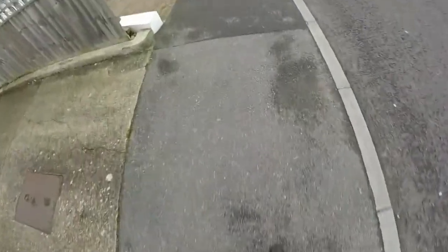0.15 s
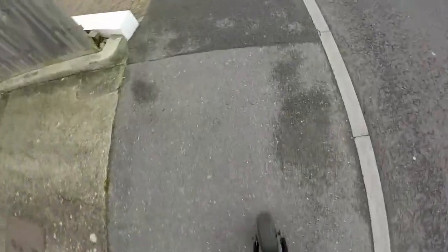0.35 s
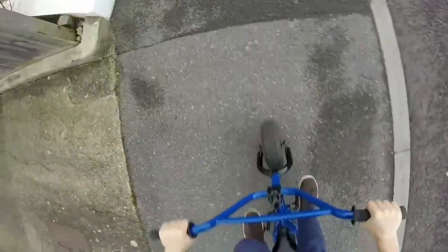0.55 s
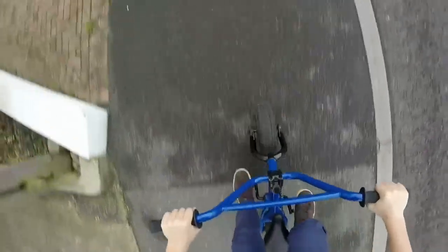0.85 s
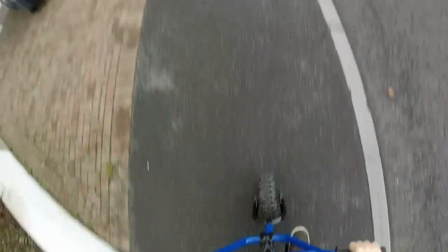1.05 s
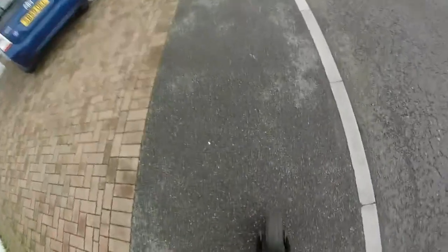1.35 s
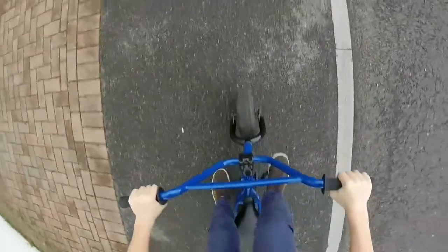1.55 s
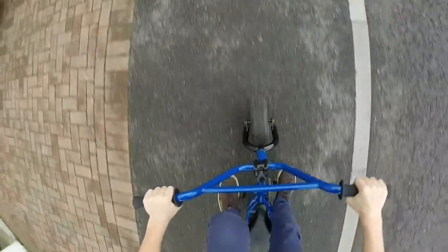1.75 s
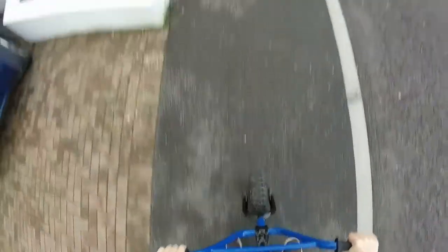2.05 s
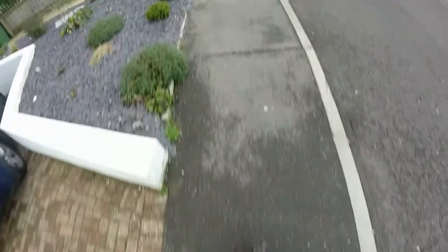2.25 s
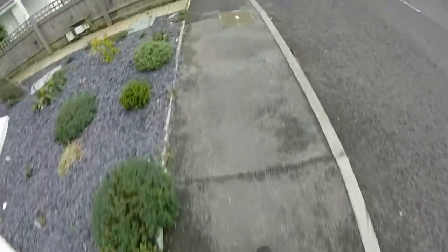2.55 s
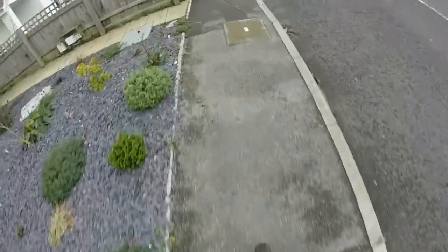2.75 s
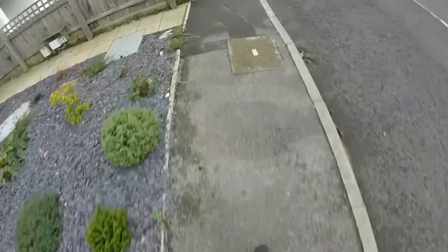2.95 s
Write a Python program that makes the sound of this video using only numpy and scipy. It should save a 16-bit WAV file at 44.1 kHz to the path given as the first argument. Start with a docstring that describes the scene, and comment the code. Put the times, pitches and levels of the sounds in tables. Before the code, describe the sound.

Wind buffets the microphone as a rolling bicycle gives raspy squeaks and light rattles.

```python
"""An asphalt pavement, heard from a small rolling bike through a microphone worn by the rider.
Wind rumbles on the microphone; the tyres hiss, hum and crackle over grit.
Road shake makes the metal frame jingle, chain and frame tick, and a loose part pings.
Something on the bike rubs: dense slips ring its resonances in short, quack-like rasps
that sometimes chirp, and near the end it drags in one longer scrape."""
import sys
import numpy as np
from scipy import signal
from scipy.fft import rfft, irfft
from scipy.io import wavfile
from scipy.ndimage import uniform_filter1d

SR = 44100
rng = np.random.default_rng(int(sys.argv[2]) if len(sys.argv) > 2 else 0)


def bounce(signal):
    """Save signal as a 16-bit WAV file at the path given by the first command-line argument."""
    frames = np.transpose(np.atleast_2d(signal))
    limited = np.clip(frames, -1, 1)
    pcm = np.round(limited * 32767).astype(np.int16)
    wavfile.write(sys.argv[1], SR, pcm)


N = 138915
T = np.arange(N) / SR


def amp(db):
    """Decibels to gain."""
    return 10 ** (np.asarray(db) / 20)


def unit(x):
    """Scales to rms 1."""
    return x / np.sqrt(np.mean(x ** 2) + 1e-20)


def curve(rows, column=1):
    """One column of a time table, interpolated per sample."""
    rows = np.array(rows)
    return np.interp(T, rows[:, 0], rows[:, column])


def colour(x, spectrum, tilt_db_per_oct=0):
    """Filters by a (frequency [Hz], gain [dB]) table and a tilt; rms 1."""
    octave = np.log2(np.fft.rfftfreq(len(x), 1 / SR) + 1)
    hz, db = np.transpose(spectrum)
    gain_db = np.interp(octave, np.log2(hz + 1), db) + tilt_db_per_oct * octave
    return unit(irfft(rfft(x) * amp(gain_db), len(x)))


def steady(x, window_s):
    """Holds the short-term rms at 1."""
    window = signal.windows.hann(max(int(window_s * SR), 8))
    power = signal.fftconvolve(x ** 2, window / window.sum(), "same")
    return x / np.sqrt(np.abs(power) + 1e-6)


def clicks(rate_per_s, spread_db):
    """Random clicks of uneven size."""
    size = amp(spread_db * np.minimum(rng.exponential(1, N), 4))
    return size * rng.choice([-1., 1.], N) * (rng.random(N) < rate_per_s / SR)


def resonate(x, hz, width_hz):
    """Unity-gain resonance; hz may be a curve."""
    carrier = np.exp(2j * np.pi * np.cumsum(hz * np.ones(len(x))) / SR)
    pole = np.exp(-np.pi * width_hz / SR)
    return 2 * (carrier * signal.lfilter([1 - pole], [1, -pole], x / carrier + 1e-18)).real


def resonate_twice(x, hz, width_hz):
    """Two equal resonances in series; rms 1."""
    return unit(resonate(resonate(x, hz, width_hz), hz, width_hz))


# Turbulence envelope: (time [s], level [dB])
WIND_LEVEL = [(0, -46.5), (.3, -36), (.41, -36), (.45, -48), (.49, -34), (.63, -35), (.73, -39.5),
              (.88, -26), (1.07, -34.5), (1.16, -43), (1.22, -33), (1.48, -34.5), (1.64, -36.5),
              (1.72, -39), (1.8, -32), (1.93, -31.5), (1.99, -39.5), (2.05, -38.5), (2.25, -33.5),
              (2.5, -39.5), (2.73, -34), (3.0, -42)]
# Turbulence spectrum: (frequency [Hz], gain [dB])
WIND_SPECTRUM = [(5, -6.5), (14, 15.5), (25, -2.5), (40, 0), (55, -4.5), (70, -17), (90, -50), (200, -88),
                 (600, -100)]
# Jolts: (time [s], level [dB], width [s])
AIR_JOLTS = [(0.224, -26.5, 0.015), (.54, -22.5, 0.015), (0.82, -18.5, 0.015), (.884, -24.5, 0.0095),
             (0.986, -21.5, 0.0085), (1.04, -27, .013), (1.753, -19.5, 0.0062), (1.82, -17, 0.014),
             (1.933, -31.5, 0.0059), (2.286, -34, 0.018), (2.574, -28.5, .014)]


def wind():
    """Turbulence at the microphone; each jolt is one push and pull of air."""
    eddies = steady(colour(rng.standard_normal(N), WIND_SPECTRUM), window_s=0.077)
    pushes = sum(amp(db) * (at_s - T) / width_s * np.exp(.5 - .5 * ((T - at_s) / width_s) ** 2)
                 for at_s, db, width_s in AIR_JOLTS)
    return amp(curve(WIND_LEVEL)) * eddies + pushes


# Rolling hiss spectrum: (frequency [Hz], gain [dB])
ROLL_SPECTRUM = [(47, -9), (85, -0.5), (150, -3), (250, -8.5), (350, -9.5), (600, -13), (1000, -15.5),
                 (1700, -14), (2300, -17), (2750, -18.5), (3400, -21), (4800, -25.5), (7000, -31),
                 (10000, -37), (15000, -45.5)]
# Tyre hum envelope: (time [s], level [dB])
HUM_LEVEL = [(0, -65.5), (1.0, -67.5), (1.6, -62), (1.8, -61.5), (2.2, -67), (2.7, -58), (3.0, -58),
             (3.15, -58)]
# Tyre hum spectrum: (frequency [Hz], gain [dB])
HUM_SPECTRUM = [(40, -14), (90, -5.5), (160, 2.5), (400, -4.5), (900, -8.5), (2000, -20.5), (6000, -56)]


def tyres(hiss_db=-55.5):
    """Rolling on asphalt: even hiss and a low hum that grows toward the end."""
    hiss = amp(hiss_db) * colour(rng.standard_normal(N), ROLL_SPECTRUM)
    hum = amp(curve(HUM_LEVEL)) * colour(rng.standard_normal(N), HUM_SPECTRUM)
    return hiss + hum


# Grit envelope: (time [s], level [dB])
GRIT_LEVEL = [(0, -78), (.38, -73.5), (.62, -72), (.78, -69), (.93, -65), (1.03, -72), (1.15, -66),
              (1.33, -67.5), (1.52, -77.5), (1.74, -72), (1.82, -67), (2.0, -69.5), (2.25, -68.5),
              (2.5, -74.5), (2.85, -70), (3.15, -76)]
# Crack spectrum: (frequency [Hz], gain [dB])
CRACK_SPECTRUM = [(500, -25), (2000, 17), (3400, 10), (4500, 11), (6000, 1), (8500, -32), (12000, -14),
                  (15000, -74)]
# Metal frame modes: (frequency [Hz], width [Hz], gain [dB])
FRAME_RESONANCES = [(2690, 230, 2.5), (3966, 120, 2), (4400, 610, 3), (4980, 190, -5.5), (5930, 160, -5.5),
                    (8280, 240, -14)]


def grit(crack_gain_db=-6.5):
    """Grains crack under the tread and ring the frame."""
    grains = clicks(rate_per_s=1100, spread_db=4.5)
    ring = unit(sum(amp(db) * resonate(grains, hz, width_hz) for hz, width_hz, db in FRAME_RESONANCES))
    cracks = amp(crack_gain_db) * colour(grains, CRACK_SPECTRUM)
    return amp(curve(GRIT_LEVEL)) * (ring + cracks)


# High hiss envelope: (time [s], level [dB])
SIZZLE_LEVEL = [(0, -72), (.25, -80), (.4, -73), (.5, -82), (.6, -83)]


def sizzle():
    """Faint, thin high hiss, strongest at the start."""
    return amp(curve(SIZZLE_LEVEL)) * resonate_twice(rng.standard_normal(N), hz=5660, width_hz=420)


# Jingle envelope: (time [s], level [dB])
JINGLE_LEVEL = [(0, -76), (.72, -75), (.82, -63.5), (.93, -64), (1.03, -71), (1.15, -65), (1.3, -74),
                (1.9, -72), (2.07, -66), (2.22, -77), (2.32, -64.5), (2.48, -77), (3.15, -67)]


def jingle():
    """Road shake rings the frame's lowest mode in uneven bursts."""
    shake = clicks(rate_per_s=450, spread_db=5)
    return amp(curve(JINGLE_LEVEL)) * resonate_twice(shake, hz=FRAME_RESONANCES[0][0], width_hz=500)


# Rubbing part's modes at pitch ratio 1: (frequency [Hz], width [Hz], gain [dB])
RUB_RESONANCES = [(1416, 314, -2.5), (1740, 200, 2), (1910, 235, -1.5), (2156, 162, -1), (2490, 570, -11)]


def friction(pitch_ratio):
    """Dense, irregular slips ring the rubbing part; steady level."""
    slips = clicks(rate_per_s=2600, spread_db=2)
    ring = sum((-1) ** k * amp(db) * resonate(slips, hz * pitch_ratio, width_hz)
               for k, (hz, width_hz, db) in enumerate(RUB_RESONANCES))
    band = signal.butter(3, [1160, 3080], "band", fs=SR, output="sos")
    return steady(unit(signal.sosfilt(band, ring)), window_s=0.12)


# Short contacts: (peak time [s], rise [s], fall [s], level [dB], pitch [ratio])
RUB_CONTACTS = [(.02, 0.02, 0.042, -55, 1.1), (.194, .014, 0.014, -59, 1.06),
                (.519, .007, .035, -49.5, 0.99), (.695, 0.02, 0.022, -58.5, 1.02),
                (0.778, 0.051, 0.021, -44, 1.04), (1.32, 0.037, 0.029, -44, 1.0),
                (1.429, 0.038, .027, -48, 1), (1.517, 0.044, .04, -50.5, 1.01),
                (1.71, 0.1, 0.12, -55, 1.06), (1.775, 0.016, .014, -46, 1.02),
                (1.799, 0.017, 0.025, -43, 1.033), (1.829, 0.011, 0.018, -44, 1.008),
                (1.93, 0.059, 0.13, -57.5, .99), (2.459, 0.035, 0.03, -54.5, 1)]


def rubs(body_gain_db=-13.5):
    """Each contact swells and lets go: a rasp over a dull body."""
    envelopes = np.array([amp(db) * np.exp(-2 * ((T - at_s) / np.where(T < at_s, rise_s, fall_s)) ** 2)
                          for at_s, rise_s, fall_s, db, _ in RUB_CONTACTS])
    pitch_ratio = np.array(RUB_CONTACTS)[envelopes.argmax(0), 4]  # loudest contact sets the pitch
    body = amp(body_gain_db) * colour(rng.standard_normal(N), HUM_SPECTRUM)
    return np.linalg.norm(envelopes, axis=0) * (friction(pitch_ratio) + body)


# Chain and frame knocks: (time [s], level [dB], rattle length [s], tilt [dB/octave])
KNOCKS = [(0.142, -50, .003, -11), (.465, -55.5, .0026, -5), (0.848, -59, .002, 4),
          (0.9797, -45.5, 0.0022, -5), (0.9818, -49.5, 0.0016, -13), (1.059, -57, .0016, -3),
          (1.098, -57, .004, 1), (1.2287, -48.5, 0.0016, 0), (1.233, -60, .0012, -4),
          (1.779, -57.5, 0.015, 4), (1.784, -57.5, 0.026, 3), (1.842, -59, 0.0054, 8),
          (1.917, -59, .0036, 8), (1.922, -58, .0032, 14), (2.228, -64, .0022, 24), (2.292, -59, .002, 18),
          (2.829, -64, .004, 26)]
# Rattle spectrum before tilt: (frequency [Hz], gain [dB])
RATTLE_SPECTRUM = [(500, -20), (1900, -5), (2700, 10), (3400, 9), (4300, 7.5), (5200, 8.5), (7000, -1.5),
                   (10000, -14.5), (15000, -42)]


def ticks(attack_s=0.00027, ring_decay_s=0.0047, ring_gain_db=-2.5, size=4096):
    """Tiny knocks: a brief noisy rattle plus the frame's decaying modes."""
    out, t = np.zeros(N + size), np.arange(size) / SR
    hz, _, mode_db = np.transpose(FRAME_RESONANCES)
    for at_s, db, length_s, tilt in KNOCKS:
        modes = np.sin(2 * np.pi * (hz[:, None] * t + rng.random((len(hz), 1))))
        mode_gains = amp(mode_db + tilt * np.log2(hz))
        ring = amp(ring_gain_db) * np.exp(-t / ring_decay_s) * unit(mode_gains @ modes)
        rattle = np.exp(-(t / length_s) ** 2) * colour(rng.standard_normal(size), RATTLE_SPECTRUM, tilt)
        out[round(at_s * SR):][:size] += amp(db) * np.minimum(t / attack_s, 1) * (ring + rattle)
    return out[:N]


# Rub chirps: (peak time [s], half length [s], level [dB], centre pitch [Hz], glide [Hz/s])
RUB_CHIRPS = [(0.187, 0.0075, -57, 1630, -20000), (0.195, 0.0058, -51, 1930, -35000),
              (1.78, .007, -49.5, 1870, -12000), (1.792, 0.01, -43.5, 1704, -1000),
              (1.842, 0.01, -53, 2220, 6000)]


def chirps(waver_depth=0.0117):
    """Slips briefly lock into one gliding, slightly wavering tone."""
    waver = 1 + waver_depth * unit(uniform_filter1d(rng.standard_normal(N), size=100))
    out = np.zeros(N)
    for at_s, half_s, db, hz, glide_hz_per_s in RUB_CHIRPS:
        cycles = np.cumsum((hz + glide_hz_per_s * (T - at_s)) * waver) / SR
        out += amp(db) * np.exp(-((T - at_s) / half_s) ** 2) * np.sqrt(2) * np.sin(2 * np.pi * cycles)
    return out


# Loose part's strikes: (time [s], level [dB])
PING_STRIKES = [(2.024, -64), (2.207, -64), (2.268, -57.5), (2.293, -66), (2.367, -62)]


def pings(hz=4860, decay_s=0.0058):
    """A loose metal part rings in one fast-decaying mode."""
    out = np.zeros(N)
    for at_s, db in PING_STRIKES:
        t = np.maximum(T - at_s, 0)
        out += amp(db) * np.exp(-t / decay_s) * np.sqrt(2) * np.sin(2 * np.pi * hz * t)
    return out


# Scrape envelope: (time [s], level [dB])
SCRAPE_LEVEL = [(2.5, -75), (2.58, -60.5), (2.645, -55), (2.69, -59.5), (2.725, -53.5), (2.8, -60),
                (2.85, -60.5), (2.89, -54), (2.94, -53.5), (2.97, -57.5), (3.04, -48.5), (3.075, -56.5),
                (3.1, -51.5), (3.15, -57)]
# Half-formed squeal: (time [s], pitch [Hz], level [dB])
SQUEAL_TRACK = [(2.85, 2750, -79), (2.885, 2700, -54), (2.93, 2560, -62), (2.97, 2820, -54.5),
                (3.0, 2600, -52), (3.03, 2500, -53.5), (3.055, 1730, -56), (3.09, 1700, -65)]


def scrape():
    """A longer, lighter contact with a fuzzy squeal that falls at its end."""
    rasp = amp(curve(SCRAPE_LEVEL)) * friction(pitch_ratio=1.155)
    squeal = resonate_twice(rng.standard_normal(N), curve(SQUEAL_TRACK), width_hz=300)
    return rasp + amp(curve(SQUEAL_TRACK, column=2)) * steady(squeal, window_s=0.021)


def scene():
    """All sources at one microphone."""
    riding = wind() + tyres() + grit() + sizzle()
    rubbing = rubs() + chirps() + scrape()
    metal = ticks() + jingle() + pings()
    return (riding + rubbing + metal)[None]


def record(dry):
    """Low-pass at 15.1 kHz."""
    lowpass = signal.firwin(511, 15100, window=("kaiser", 9), fs=SR)
    return signal.oaconvolve(dry, lowpass[None], "same")


dry = scene()
out = record(dry)
bounce(out)
```